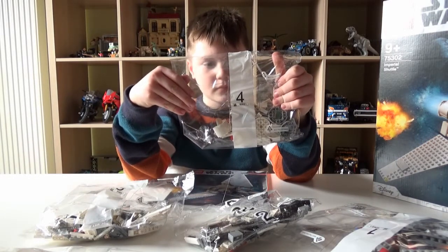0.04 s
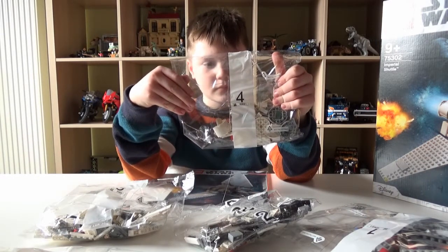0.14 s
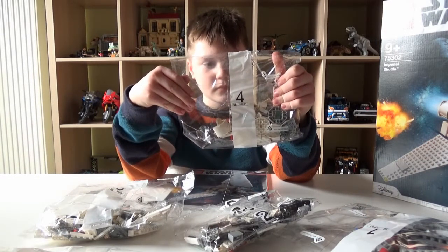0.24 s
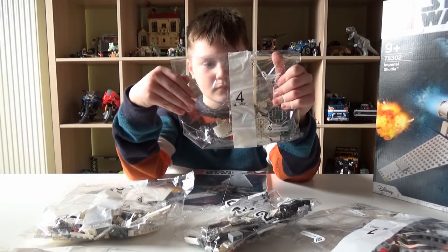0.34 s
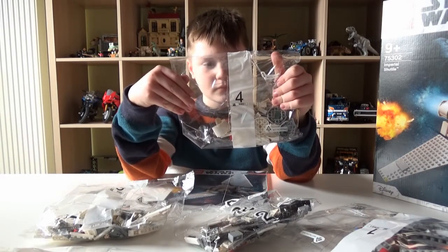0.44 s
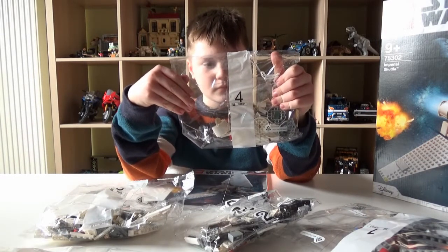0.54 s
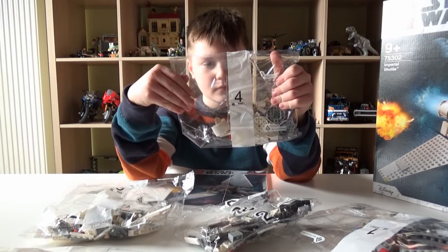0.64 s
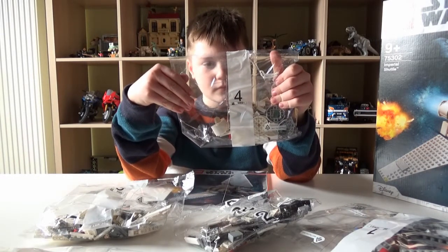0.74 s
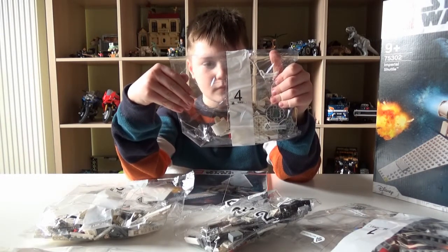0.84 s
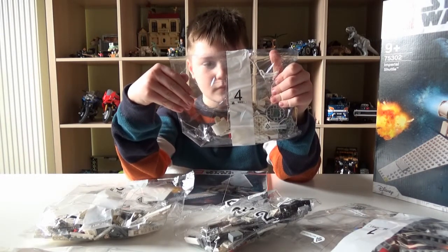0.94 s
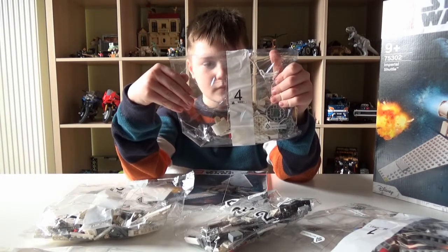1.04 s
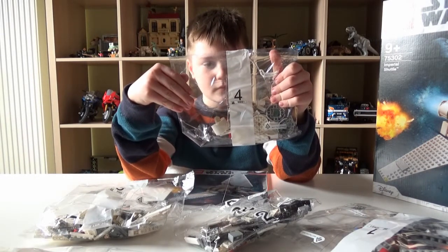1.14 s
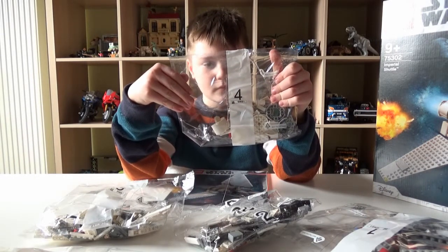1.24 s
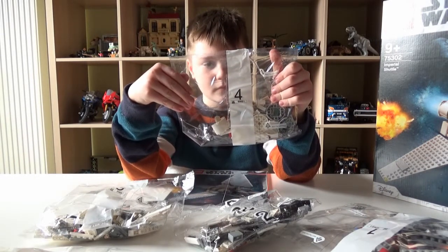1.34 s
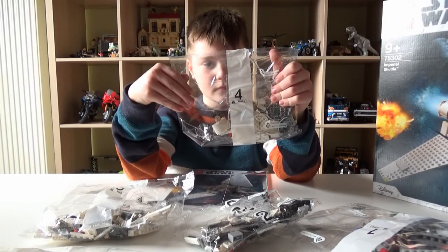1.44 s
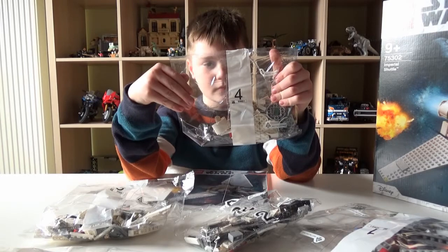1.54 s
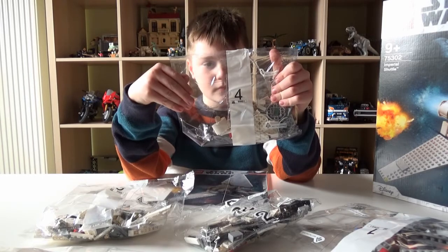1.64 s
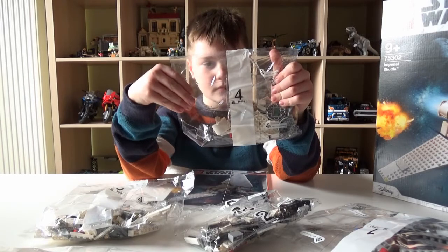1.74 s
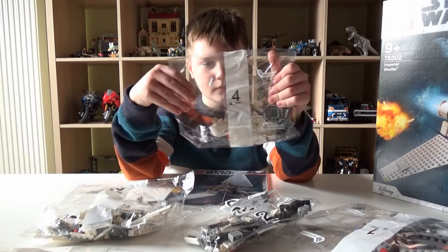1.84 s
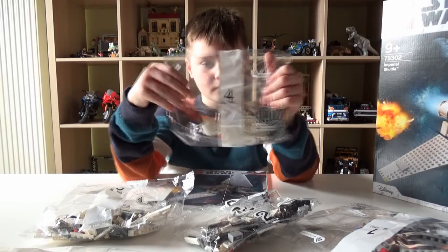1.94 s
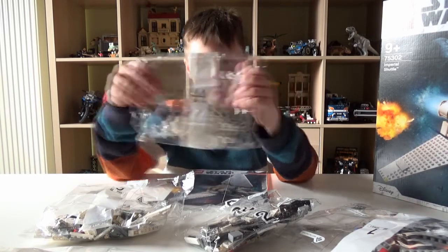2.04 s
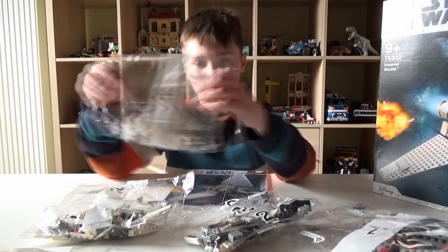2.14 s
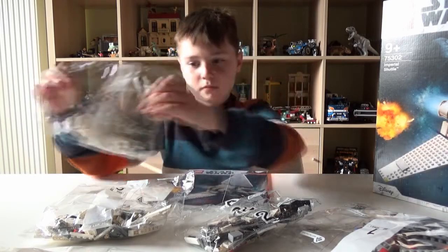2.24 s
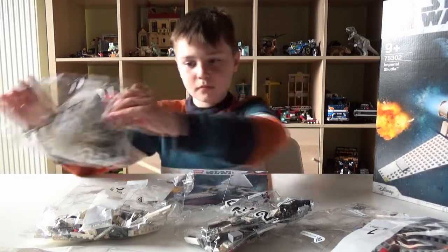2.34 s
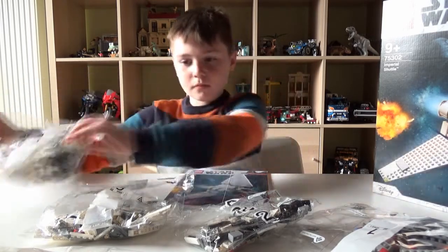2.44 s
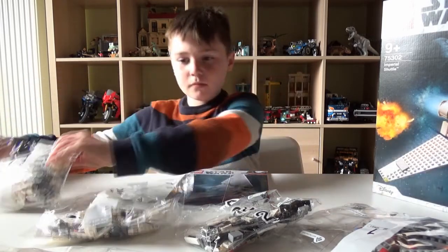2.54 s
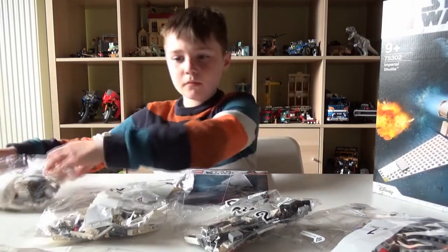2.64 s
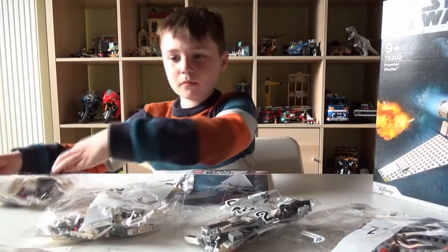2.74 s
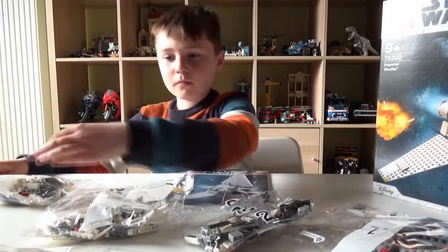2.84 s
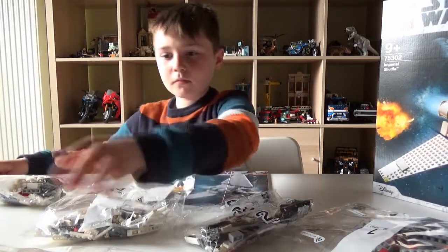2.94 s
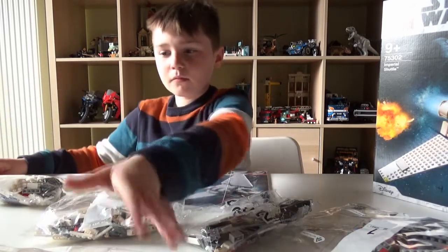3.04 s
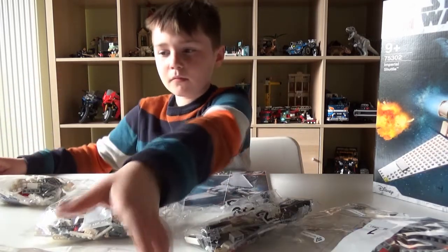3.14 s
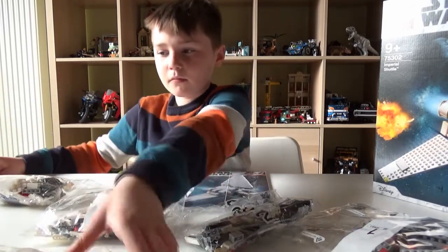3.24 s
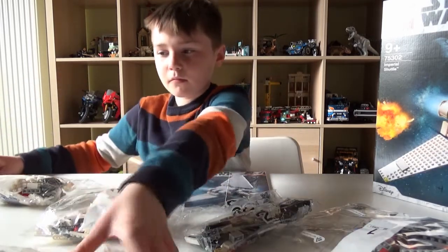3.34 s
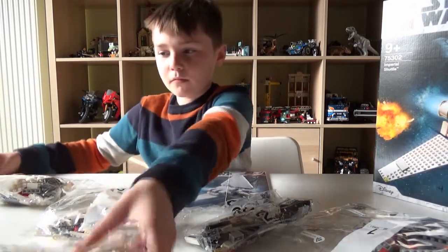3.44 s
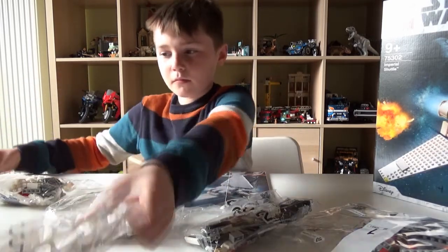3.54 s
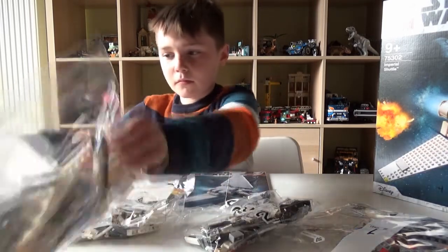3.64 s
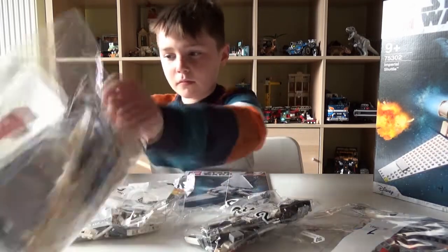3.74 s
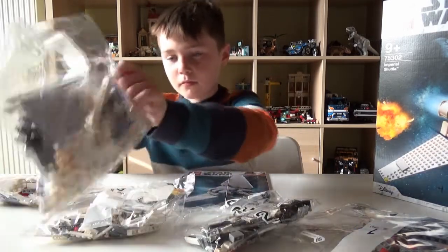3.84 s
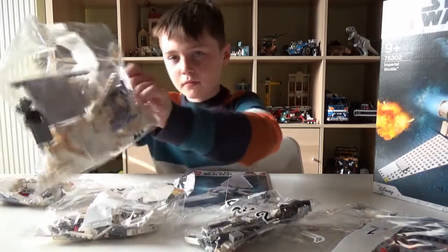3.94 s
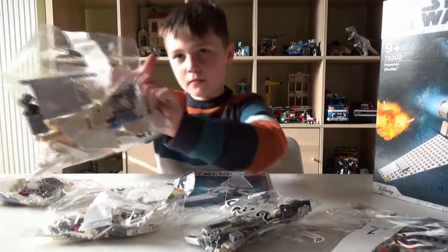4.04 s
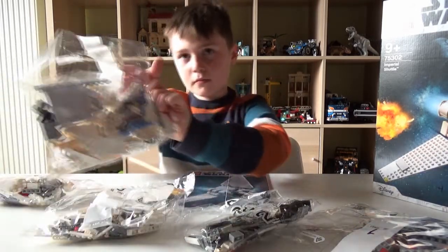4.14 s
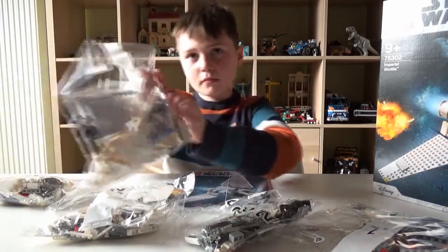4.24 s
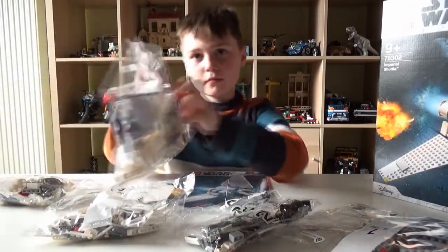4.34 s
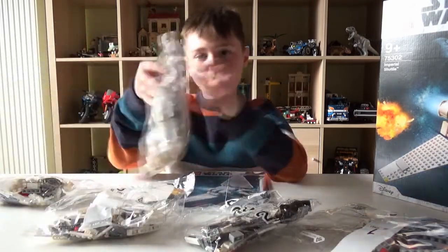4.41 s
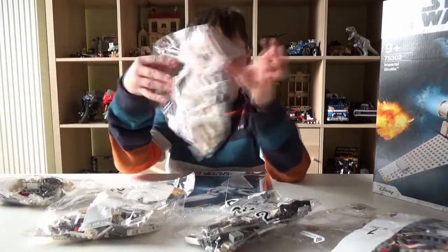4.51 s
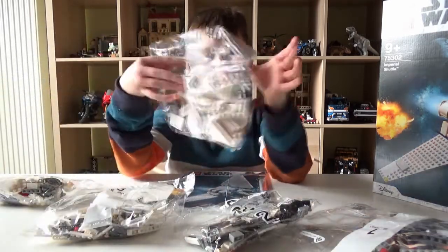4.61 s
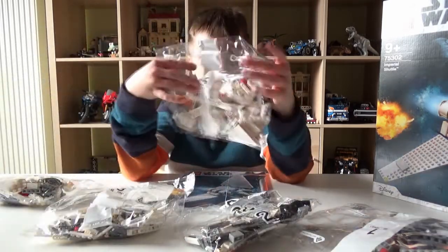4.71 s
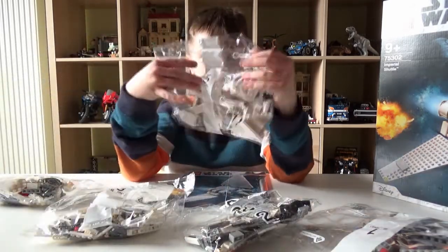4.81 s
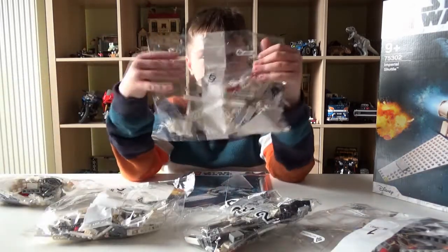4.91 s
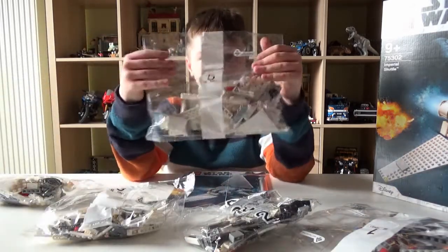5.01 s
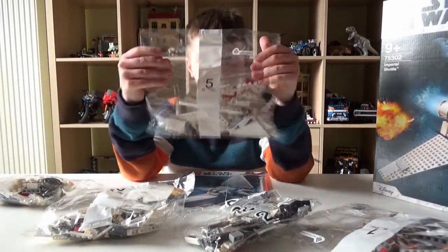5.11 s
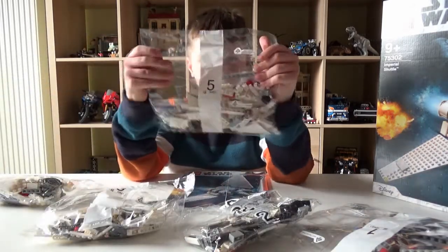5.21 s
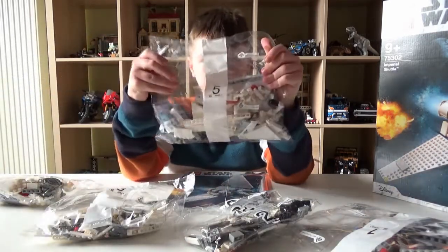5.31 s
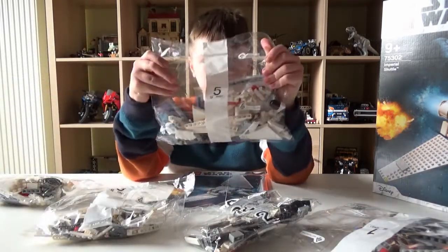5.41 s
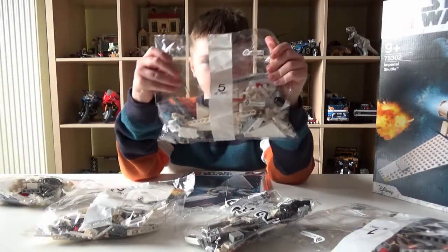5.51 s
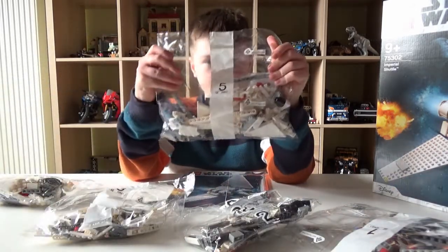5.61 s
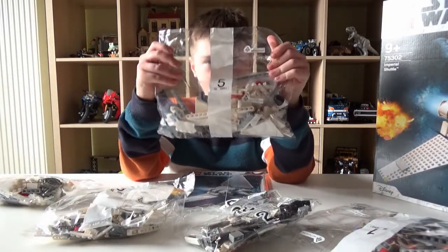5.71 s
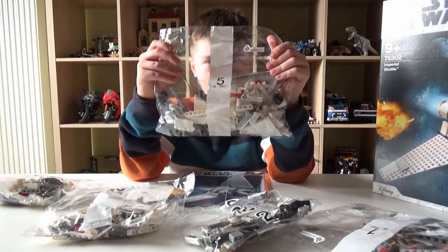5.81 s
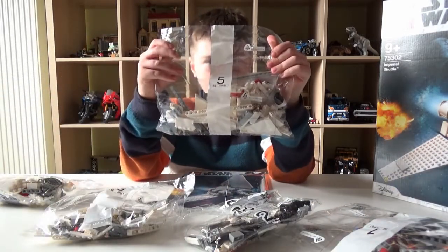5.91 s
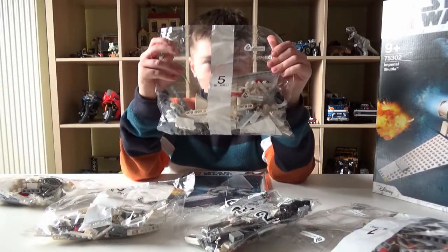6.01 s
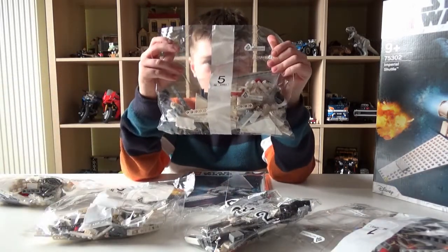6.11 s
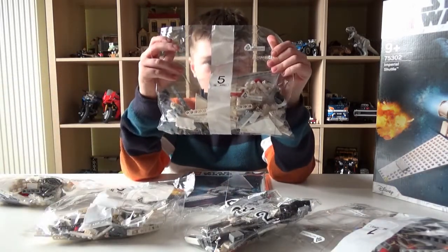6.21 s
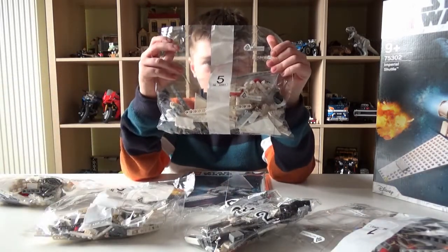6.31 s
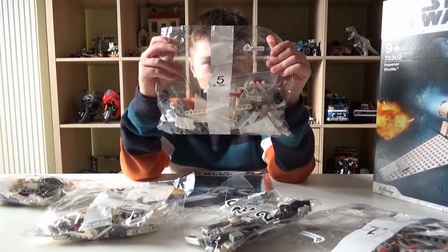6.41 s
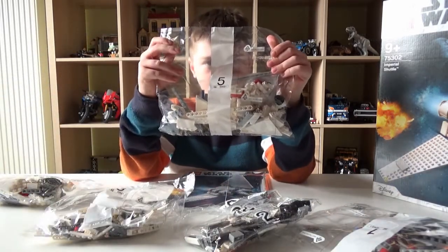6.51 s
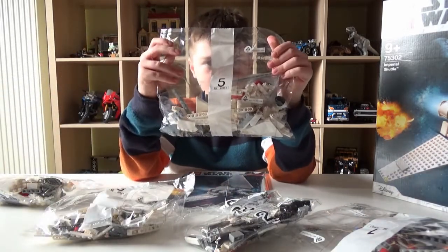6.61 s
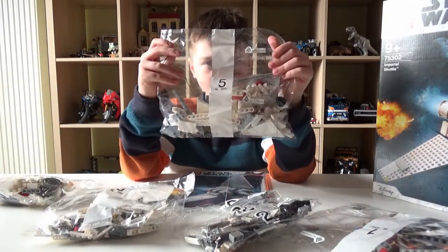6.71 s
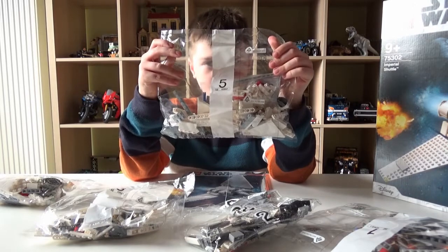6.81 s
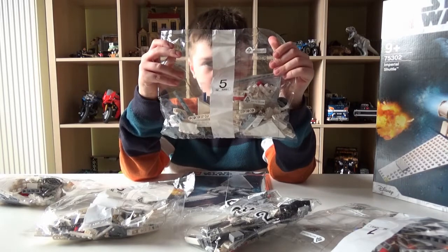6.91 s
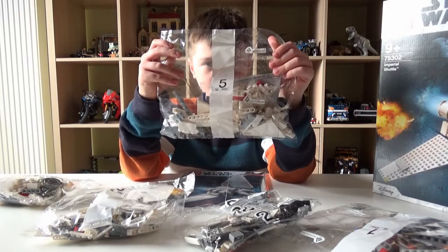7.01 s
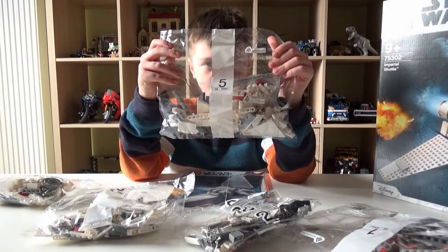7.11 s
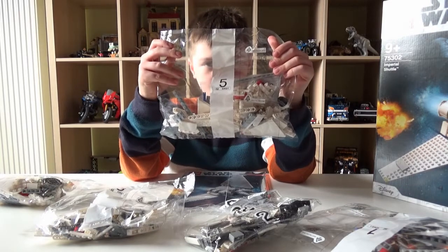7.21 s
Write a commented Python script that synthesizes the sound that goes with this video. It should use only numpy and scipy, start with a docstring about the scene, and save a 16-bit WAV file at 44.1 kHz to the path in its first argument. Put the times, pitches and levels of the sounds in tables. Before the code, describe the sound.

Crisp plastic film crackles in two busy stretches, with small hard pieces tumbling and clicking inside, then thins to sparse snaps in a quiet room.

```python
"""Sealed plastic bags of small toy bricks, held up, put down on a table and picked up close by in a small room.
The stiff film buckles in sharp snaps (coloured noise bursts) over a swarm of tiny resonant crinkles.
Inside, bricks tumble (a lower swarm) and clink (short two-mode rings); slides hiss and soft bumps thud.
Two close microphones also take in the walls, quiet air and a faint electronic tick; a limiter holds the peaks."""
import sys
import numpy as np
from scipy import signal
from scipy.fft import rfft, irfft, next_fast_len
from scipy.io import wavfile
from scipy.ndimage import uniform_filter1d, minimum_filter1d

SR = 44100
rng = np.random.default_rng(int(sys.argv[2]) if len(sys.argv) > 2 else 0)


def persist_wave(psi):
    """Save psi, clipped to +-1, as 16-bit WAV."""
    counts = np.round(np.clip(psi, -1, 1) * 32767).astype(np.int16)
    wavfile.write(sys.argv[1], SR, np.atleast_2d(counts).T)


N = 320166
T = np.arange(N) / SR
TOP_HZ = 16000  # band limit
BURST_SAMPLES = 1024

# each grip, lift or turn of a bag: start t/s, hold/s, crinkling film level/dB, tumbling bricks level/dB
# (levels before the trims in handling)
MOVES = [(1.845, 0.035, -45, -55), (1.889, 0.09, -36, -43), (1.99, 0.085, -29, -43),
         (2.129, 0.14, -34, -43), (2.249, .11, -26, -39), (2.374, 0.16, -32, -46), (2.538, 0.068, -23, -32),
         (2.66, .15, -32, -41.5), (2.889, 0.096, -54, -63.5), (2.981, 0.045, -46, -46),
         (3.099, .07, -52.5, -60), (3.168, .1, -39, -44.5), (3.278, 0.14, -26, -35),
         (3.439, 0.18, -22, -35), (3.65, 0.16, -25.5, -40.5), (3.861, 0.13, -24.5, -40),
         (3.978, 0.11, -21.5, -36), (4.12, 0.073, -32, -39), (4.2, .15, -24.5, -35), (4.421, .13, -28, -44),
         (4.58, 0.093, -39.5, -46.5), (4.705, .16, -25.5, -37.5), (4.884, 0.061, -19, -30.5),
         (4.959, 0.13, -21.5, -39), (5.135, .2, -20.5, -36.5), (5.349, .1, -25.5, -45),
         (5.502, .08, -42.5, -44.5), (5.61, 0.17, -29, -41.5), (5.847, 0.096, -39.5, -41.5),
         (5.984, 0.081, -51, -51.5), (6.15, .07, -50.5, -59)]


def amp(db):
    """Amplitude factor of a level in dB."""
    return 10 ** (np.asarray(db) / 20)


def unit(x):
    """Each row at rms 1."""
    return x / np.sqrt(np.mean(x ** 2, axis=-1, keepdims=True) + 1e-20)


def along(points, hz):
    """Values between (Hz, value) points on a log frequency axis."""
    f, v = np.transpose(points)
    return np.interp(np.log(hz + 1), np.log(f + 1), v)


def colour(points):
    """A spectrum on the frequency grid of one burst."""
    return along(points, np.fft.rfftfreq(BURST_SAMPLES, 1 / SR))


def hump(centre_hz, octaves):
    """A bell on log frequency for each centre, 0 to 1."""
    hz = np.fft.rfftfreq(BURST_SAMPLES, 1 / SR) + 1
    return np.exp(-.5 * (np.log2(hz / centre_hz[:, None]) / octaves) ** 2)


def filtered(x, response):
    """x times a response of frequency."""
    m = next_fast_len(N + SR // 2)
    return irfft(rfft(x, m) * response(np.fft.rfftfreq(m, 1 / SR)), m)[..., :N]


def noise(spectrum):
    """Steady coloured noise of rms 1."""
    return unit(filtered(rng.standard_normal(N), lambda hz: amp(along(spectrum, hz))))


def clicks(colour_db):
    """Causal clicks of energy 1, one for each row of dB."""
    lag = np.arange(BURST_SAMPLES)
    cepstrum = irfft(np.log(amp(colour_db)))
    # folding the cepstrum onto positive lags gives minimum phase
    fold = 1 + np.sign(BURST_SAMPLES // 2 - lag) - (lag == 0)
    return unit(irfft(np.exp(rfft(cepstrum * fold)))) / np.sqrt(BURST_SAMPLES)


def bursts(colour_db, life):
    """Short noise bursts of energy 1, each in its own colour, dying with time constant life in s."""
    t = np.arange(BURST_SAMPLES) / SR
    envelope = np.sqrt(t / life) * np.exp(-t / life)
    kick = rng.standard_normal((len(colour_db), BURST_SAMPLES)) * envelope
    return unit(irfft(rfft(kick) * rfft(clicks(colour_db)))) / np.sqrt(BURST_SAMPLES)


def placed(times, shapes):
    """The sum of short sounds, one a row, each at its time."""
    start = np.round(np.abs(times) * SR).astype(int)
    at = start[:, None] + np.arange(shapes.shape[1])
    return np.bincount(at.ravel(), shapes.ravel(), N)[:N]


def background(level_db=-66.5, whine_db=-77, whine_hz=4980, flutter=.4):
    """Quiet room air and hiss; the camera's electronics tick faintly once a frame."""
    # room air and hiss: f/Hz, relative level/dB
    air_colour = [(20, -19.5), (35, -16), (53, -4), (85, -19.5), (200, -7.5), (400, -5), (1150, -1),
                  (1700, -6), (2400, -4.5), (5000, -9.5), (9000, -9), (16000, -14)]
    # stereo width of that air: f/Hz, gain of the side signal/dB
    air_width = [(50, -7), (300, -4), (1000, 0.5), (2500, -3), (6000, -7.5), (12000, -15.5)]
    frame = (T - .031) % (1 / 25)  # s since the last tick
    wander = unit(uniform_filter1d(rng.standard_normal(N), size=900))
    strength = amp(whine_db) * (1 + flutter * wander)
    tick = np.exp(-frame / 0.0079) * (1 - np.exp(-frame / .001))
    whine = strength * tick * 2 * np.sin(2 * np.pi * whine_hz * T)
    mid = amp(level_db) * noise(air_colour) + whine
    side = amp(level_db) * filtered(noise(air_colour), lambda hz: amp(along(air_width, hz)))
    return np.array([mid + side, mid - side])


def room(x, width=0.36, gap=0.0021):
    """Walls and shelves answer with a short diffuse tail, much alike at the two close microphones."""
    # reverberation of the small room: f/Hz, t60/s
    decay = [(200, 0.32), (800, 0.49), (2200, 0.4), (6000, 0.34), (10000, 0.21), (15000, 0.025)]
    hz, t, z = signal.stft(rng.standard_normal((2, SR // 2)), SR, nperseg=256)
    fade = np.exp(-np.log(1000) * t / along(decay, hz)[:, None])
    tail = signal.istft(z * fade, SR, nperseg=256)[1]
    # the tail builds up over the gap (s)
    tail = tail * (1 - np.exp(-np.arange(tail.shape[1]) / SR / gap))
    mid, side = signal.fftconvolve(x[None], tail / np.linalg.norm(tail[0]), axes=1)[:, :N]
    return np.array([mid + width * side, mid - width * side])


def bumps(level_db=19):
    """Hands and bag meet softly: a dull push with no ring."""
    # soft contacts: t/s, level/dB before level_db
    contacts = [(0.094, -51), (2.298, -44.5), (3.297, -36), (3.648, -48), (4.352, -45.5), (4.701, -39.5),
                (4.932, -39), (5.069, -37.5), (5.304, -35.5), (6.98, -50)]
    # dull push: f/Hz, relative level/dB
    thud_colour = [(25, -14.5), (70, -17), (120, -11), (200, -4.5), (350, 7.5), (900, -26), (4000, -67)]
    s, db = np.transpose(contacts)
    pushes = bursts(np.tile(colour(thud_colour), (len(s), 1)), life=0.0034)
    return placed(s, pushes * amp(db + level_db)[:, None])


def slides(rough_db=2):
    """A bag slides on the table or through the fingers: film hisses unevenly and slows to a stop."""
    # slides: t/s, length/s (time to fall to 1/e), level/dB
    passes = [(2.542, 0.089, -25), (2.773, 0.063, -40.5), (6.444, 0.087, -38.5)]
    # hiss of sliding film: f/Hz, relative level/dB
    scrape_colour = [(30, -57.5), (120, -32), (250, -17), (600, -4.5), (1200, 0), (2800, 1), (4500, 0.5),
                     (8000, 2), (11000, -12), (16000, -29)]
    level = np.zeros(N)
    for s, length, db in passes:
        onset = np.clip((T - s) / 0.0038, 0, 1)
        level += amp(db) * onset * np.exp(-np.abs((T - s) / length) ** 3)
    catches = unit(uniform_filter1d(rng.standard_normal(N), size=90))
    return level * unit(noise(scrape_colour) * amp(rough_db * catches))


def clinks(overtone=1.8, overtone_db=-16, rattle=0.86, contact=0.00033):
    """Loose thin bricks and taut film ring briefly in two bending modes, jostled by their neighbours."""
    # short rings: t/s, f/Hz, level/dB, t60/s
    rings_heard = [(3.343, 1597, -12.5, 0.016), (3.446, 3460, -32, 0.023), (3.581, 915.5, -18, 0.025),
                   (3.606, 2743, -16, 0.083), (3.619, 2930, -20.5, .04), (3.877, 2146, -18.5, 0.07),
                   (3.891, 2050, -13.5, 0.024), (4.691, 2490, -16, 0.015), (5.332, 922.4, -19.5, 0.022),
                   (5.417, 3430, -21.5, 0.11), (5.429, 2002, -14, 0.065), (5.443, 3590, -24, 0.072),
                   (5.448, 2100, -13.5, 0.045), (5.455, 2376, -24.5, 0.18), (5.478, 2096, -31, 0.2),
                   (5.541, 667, -27.5, 0.032), (5.954, 690, -40, 0.037), (6.443, 3110, -33.5, 0.23),
                   (6.442, 7200, -29, 0.055), (6.480, 3090, -37, .09), (6.481, 8500, -32, .03)]
    s, hz, db, t60 = np.transpose(rings_heard)[:, :, None]
    t = np.arange(SR // 5) / SR
    # a random walk of the phase roughens each ring
    drift = np.cumsum(rng.standard_normal((len(s), len(t))), axis=1) / 10
    phase = 2 * np.pi * hz * t + rattle * drift
    second = amp(overtone_db) * (overtone * hz < TOP_HZ / 2) * np.sin(overtone * phase)
    envelope = (1 - np.exp(-t / contact)) * np.exp(-np.log(1000) * t / t60)
    rings = placed(s[:, 0], (np.sin(phase) + second) * amp(db) * envelope)
    # parts this small radiate no bass
    return signal.sosfilt(signal.butter(4, 450, "high", fs=SR, output="sos"), rings)


def effort(attack_s=.022, release_db_per_s=240):
    """Levels of film and bricks in dB: every move takes hold quickly, holds, then settles."""
    levels = np.zeros((2, N))
    for s, hold, film_db, bricks_db in MOVES:
        rise = np.clip((T - s) / attack_s, 0, 1)
        settle = amp(-release_db_per_s * np.clip(T - s - hold, 0, 1))
        levels = np.maximum(levels, amp([[film_db], [bricks_db]]) * rise * settle)
    return 20 * np.log10(levels + 1e-9)


def swarm(level_db, spectrum, rate, spread_db, low_hz, high_hz, ring_db, octaves, life):
    """Random tiny impacts, each with its own resonance, whose joint power follows a level curve."""
    start, end = MOVES[0][0], MOVES[-1][0] + 2 * MOVES[-1][1]
    u = rng.random((8000, 4))
    u = u[:int(np.clip(rate * (end - start), 50, len(u)))]  # rate in impacts per s
    pitch = low_hz * (high_hz / low_hz) ** u[:, 1]
    size = amp(spread_db * np.minimum(-np.log(1 - u[:, 2]), np.pi))
    grains = bursts(colour(spectrum) + ring_db * hump(pitch, octaves), life * 2 ** (u[:, 3:] - .5))
    x = placed(start + (end - start) * u[:, 0], size[:, None] * grains)
    # even out the running power, then impose the level curve
    power = np.abs(uniform_filter1d(uniform_filter1d(x ** 2, size=1300), size=900))
    return x / np.sqrt(power + np.mean(x ** 2) / 100) * amp(level_db)


def handling(crinkle_db, tumble_db, film_db=-2.06, bricks_db=-2.5):
    """Flexing film crinkles finely while the bricks knock together inside it."""
    # crinkling film: f/Hz, relative level/dB
    film_colour = [(60, -50), (250, -24.5), (600, -17.5), (1400, -13.5), (2100, -4.5), (2800, -2),
                   (3700, -6.5), (5500, -1.5), (7500, -4), (9300, -3.5), (11500, -10.5), (16000, -23.5)]
    # tumbling bricks: f/Hz, relative level/dB
    brick_colour = [(30, -21), (100, -26.5), (150, -18.5), (220, -13), (380, -3), (800, 2.5), (1300, 6.5),
                    (2500, -7.5), (8000, -37.5)]
    film = swarm(crinkle_db + film_db, film_colour, rate=560, spread_db=3.5,
                 low_hz=1914, high_hz=11160, ring_db=11, octaves=0.14, life=0.00081)
    bricks = swarm(tumble_db + bricks_db, brick_colour, rate=260, spread_db=3.5,
                   low_hz=350, high_hz=1750, ring_db=12.0, octaves=0.14, life=0.00086)
    return film + bricks


def buckles(crinkle_db, per_s=60, full_effort_db=-22, grows=0.55):
    """Lesser buckles as rows for snaps: strain builds with effort and lets go at uneven moments."""
    # per_s is the rate at full effort; grows is dB of buckle for each dB of crinkling
    u, scatter = rng.random(400), rng.standard_normal((400, 3))
    strain = np.cumsum(per_s * amp(crinkle_db - full_effort_db)) / SR
    count = min(int(strain[-1]), len(u))
    at = np.searchsorted(strain, np.arange(count) + u[:count])
    # level, treble and low body in dB
    typical, spread = [-23.5, 5.5, -21.5], (1.2, 5.5, 4.5)
    db, treble_db, body_db = (typical + scatter[:count] * spread).T
    level = db + grows * (crinkle_db[at] - full_effort_db)
    return np.column_stack([T[at], level, treble_db, body_db])


def snaps(rows, level_db=20.5, pitch_db=5, lead_db=-14, lead_lives=3, side_db=-13,
          life_s=.00075, life_octaves=.8):
    """A crease gives a little, then flips over with a crack and a low push from the sheet around it.
    Returns what reaches the two microphones and what goes out to the walls."""
    # colour of one snap: f/Hz, relative level/dB
    crease_colour = [(30, -37), (100, -15.5), (220, -2.5), (450, 7.5), (900, 13), (1400, 3), (2200, 2.5),
                     (3600, 1), (5500, 1.5), (7500, -2), (9400, 1.5), (11500, -7), (16000, -26)]
    s, db, treble_db, body_db = np.transpose(rows)[:, :, None]
    u = rng.random((len(s), 4))
    life = life_s * 2 ** (life_octaves * (u[:, 3:] - .5))
    size = amp(db + level_db) * np.hypot(1, amp(body_db))
    treble = treble_db * colour([(3800, 0.07), (6500, 0.93)])
    body = body_db * colour([(1050, 0.92), (1900, 0.054)])
    tone_db = colour(crease_colour) + treble + body
    # each crease has its own pitch, 2 to 10 kHz
    crease_db = tone_db + pitch_db * hump(2000 * 5 ** u[:, 0], octaves=0.29)
    crack = placed(s[:, 0], size * bursts(crease_db, life))
    lead_s = s[:, 0] - lead_lives * life[:, 0] * u[:, 1]
    lead = placed(lead_s, size * amp(lead_db) * 2 * u[:, 2:3] * bursts(crease_db, life))
    side = placed(s[:, 0], size * amp(side_db) * bursts(crease_db, life))
    # summed over all directions, the ragged spectrum of a snap evens out
    outward = placed(s[:, 0], size * clicks(tone_db))
    return crack + lead + np.array([side, -side]), outward


def scene():
    """The bag is heard directly and off the walls, over the quiet background."""
    # the clearest buckles of the film: t/s, level/dB before level_db in snaps,
    # treble against mids/dB, low body against the crack/dB
    clear_buckles = [(0.0123, -33.5, 2.5, -20), (0.0697, -39.5, 4, -11), (0.093, -22, 0, -18.5),
                     (0.1262, -27.5, 1, -29), (0.1495, -21, 0, -27), (0.2203, -39.5, -6, -33),
                     (0.4405, -39.5, -4.5, -10.5), (0.5386, -42.5, 4, -27), (0.5611, -44, 1, -20),
                     (0.5758, -41, -15, -36), (0.724, -44, -12, -19), (0.9556, -26, 12, -17),
                     (1.6193, -39.5, 3, -23), (1.6985, -38, -1, -15), (1.7668, -29, 5, -15),
                     (1.833, -34.5, 3, -10), (1.8647, -25, 0, -16.5), (1.8909, -21, -0.5, -20),
                     (1.9083, -28, 2, -10), (1.9562, -19.5, 2.5, -15), (1.9675, -21.5, 4, -24),
                     (1.9806, -19.5, 4.5, -19), (2.0073, -21.5, 7, -10.5), (2.0513, -17, 11.5, -7),
                     (2.1272, -19.5, 2.5, -22.5), (2.1413, -23.5, 14.5, -10), (2.181, -24, 11, -25),
                     (2.2315, -21, 4.5, -18.5), (2.2893, -18.5, -5, -17), (2.3379, -20.5, 8.5, -21.5),
                     (2.3945, -20.5, 4, -14), (2.4051, -20.5, -2, -30), (2.4431, -23.5, -6, -22.5),
                     (2.4868, -24.5, 5.5, -16), (2.752, -37.5, 17, -16), (2.78, -21.5, 5, -21),
                     (2.9761, -39, 6, -7), (3.001, -38.5, -3, -5.5), (3.0114, -32.5, -6.5, -18),
                     (3.129, -43, 6, -20.5), (3.1795, -34.5, -9, -19), (3.2474, -30, -19, -21.5),
                     (3.2779, -21.5, -6, -20), (3.2995, -17.5, -11.5, -14.5), (3.3281, -21.5, 6, -20),
                     (3.3767, -20, 0, -18.5), (3.446, -14.5, -0.5, -24), (3.5803, -22.5, -1, -5),
                     (3.6505, -13.5, 4, -19), (3.6903, -19.5, 8.5, -34.5), (3.713, -18, -2, -25.5),
                     (3.7542, -18, 7, -13.5), (3.7771, -20, 8.5, -24), (3.8524, -13, 1.5, -22),
                     (3.8908, -16.5, -4.5, -40), (3.9985, -18, 1, -8), (4.1119, -19.5, 0.5, -12.5),
                     (4.1399, -19.5, -2, -20), (4.2145, -15, 5, -12.5), (4.2588, -21.5, -3, -18),
                     (4.3532, -17.5, 12, -8.5), (4.411, -9.5, 7, -19), (4.47, -20.5, 9, -24),
                     (4.484, -16.5, 3, -20.5), (4.5199, -18.5, 10, -15.5), (4.595, -19.5, 0.5, -14.5),
                     (4.6395, -14.5, 5.5, -19), (4.6909, -27.5, -11, -32), (4.7208, -15.5, 9, -13.5),
                     (4.7602, -18.5, -4, -20.5), (4.841, -13.5, 6, -32), (4.878, -15.5, 1, -18),
                     (4.9605, -13.5, 1, -20), (5.0833, -22, 18.5, -23), (5.1429, -8, 8, -13.5),
                     (5.2348, -10.5, 9.5, -22.5), (5.3648, -11.5, 8, -20), (5.4281, -17, 1, -33),
                     (5.4481, -20, -8.5, -44), (5.5146, -17.5, 4, -18), (5.576, -17.5, 4, -21),
                     (5.6086, -21.5, -2, -25), (5.6228, -20, 0, -13), (5.649, -16, 1.5, -30),
                     (5.6674, -18.5, 10, -27), (5.703, -18.5, 9.5, -19), (5.731, -18.5, 11, -14.5),
                     (5.7573, -21.5, 0, -21), (5.7733, -18, -1.5, -22), (5.79, -23.5, 11.5, -19),
                     (5.8129, -23.5, 14, -23), (5.8387, -19, 8, -13), (5.8884, -19, 8.5, -20),
                     (5.9103, -20, -3, -27), (5.9244, -20, -6.5, -28), (5.9819, -30, 5, -18),
                     (5.9997, -26.5, 2.5, -20), (6.0079, -25.5, 10, -23), (6.0602, -31, -0.5, -8.5),
                     (6.148, -28, 2.5, -16), (6.1826, -26, 0.5, -8), (6.2187, -38.5, -2, -16),
                     (6.2707, -37.5, -22, -10), (6.3731, -21, 15, -13.5), (6.3987, -29, -3.5, -20.5),
                     (6.5763, -26.5, 7, -22), (6.6261, -37, -9, -15), (6.6636, -27, -1, -11.5),
                     (6.8011, -35.5, -9.5, -17), (7.0515, -45, -1, -2), (7.0722, -28, 7.5, -21),
                     (7.1153, -23, 3.5, -20.5)]
    # where the bag is: t/s, left over right in the direct sound/dB, room share/dB
    bag_place = [(0, 1, -10), (1, -1.5, -15), (1.9, -0.2, -9), (2.3, 2.5, -10.5), (2.8, 2.5, -7),
                 (3.3, 2, -9), (3.8, 3, -8), (4.3, 0.68, -9), (4.8, 0, -7.5), (5.599, -0.16, -13),
                 (6.4, 1, -9), (7.2, -1.5, -11)]
    # the two microphones hear the bag slightly out of step: f/Hz, phase each way/rad
    mic_phase = [(100, .1), (400, 0.067), (900, 0.23), (2500, 0.29), (5000, 0.06), (12000, 0.046)]
    crinkle_db, tumble_db = effort()
    rustle = handling(crinkle_db, tumble_db) + slides() + clinks() + bumps()
    near, outward = snaps(np.vstack([clear_buckles, buckles(crinkle_db)]))
    s, pan_db, wet_db = np.transpose(bag_place)
    pan = np.interp(T, s, pan_db) / 2
    direct = (rustle + near) * amp([pan, -pan])
    walls = room((rustle + outward) * amp(np.interp(T, s, wet_db)))
    bag = filtered(direct + walls, lambda hz: np.exp(1j * np.outer([-1, 1], along(mic_phase, hz))))
    return bag + background()


def record(dry):
    """A fast limiter holds the sharpest snaps down; nothing passes above the band limit."""
    ceiling = .6  # of full scale, before the band limit
    need = np.minimum(1, ceiling / (np.abs(dry).max(axis=0) + 1e-9))
    gain = uniform_filter1d(minimum_filter1d(need, size=130), size=66)
    return filtered(dry * gain, lambda hz: hz < TOP_HZ)


dry = scene()
out = record(dry)
persist_wave(out)
```